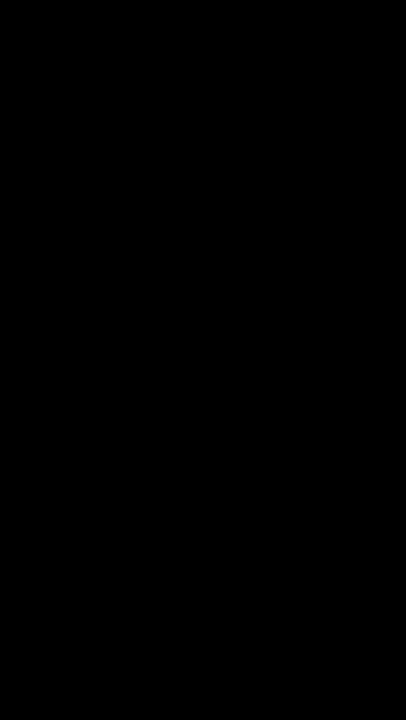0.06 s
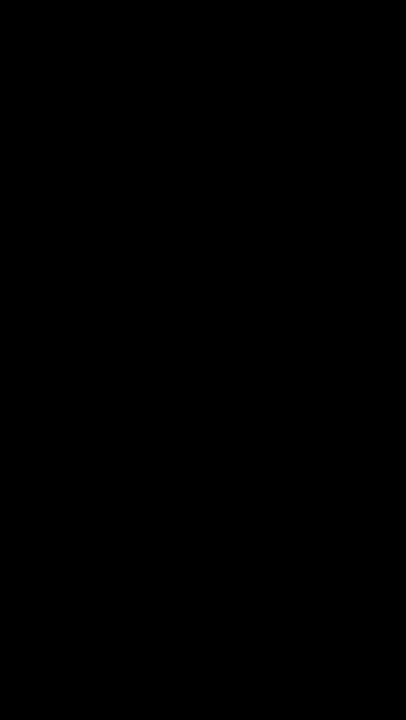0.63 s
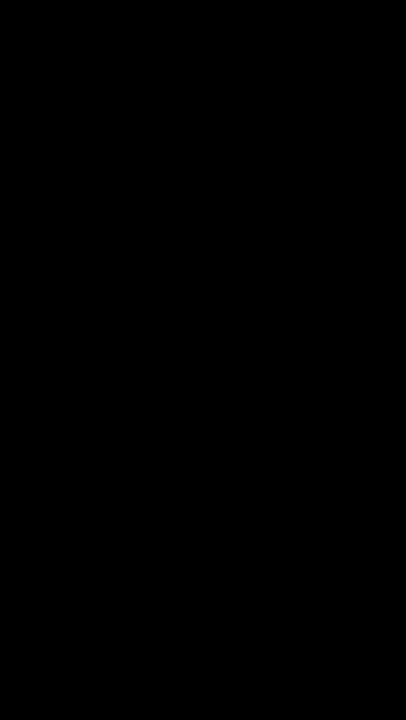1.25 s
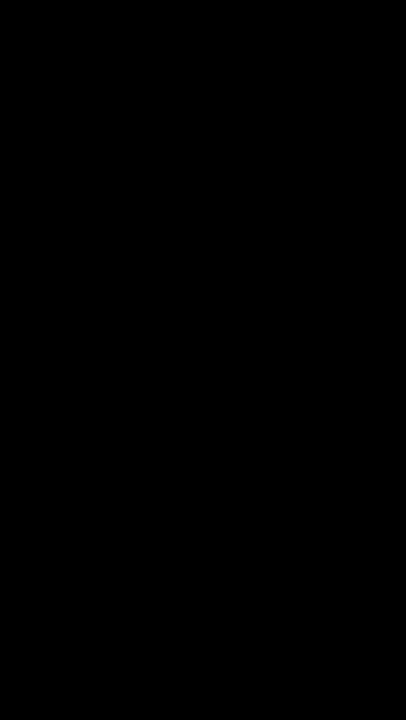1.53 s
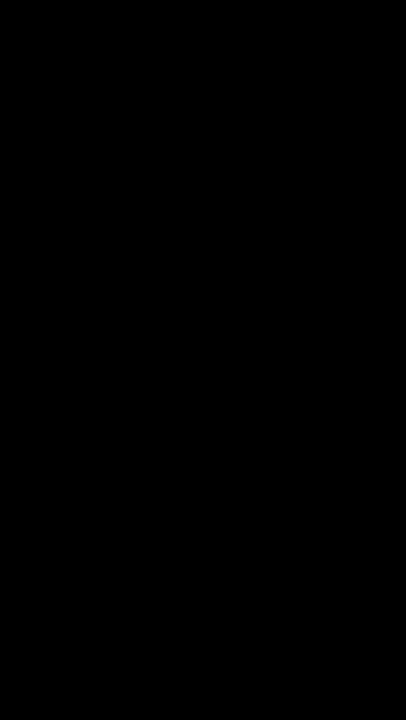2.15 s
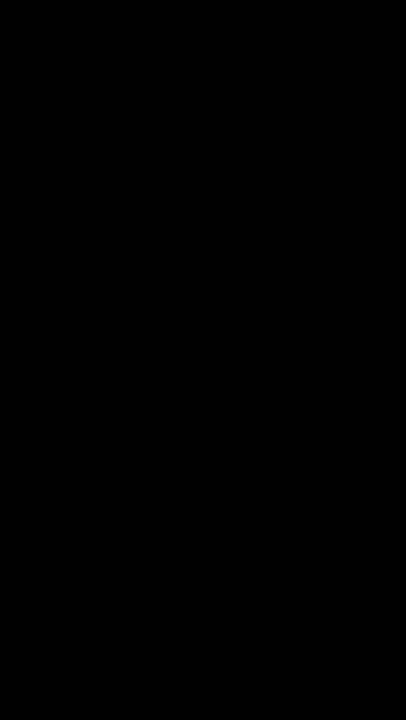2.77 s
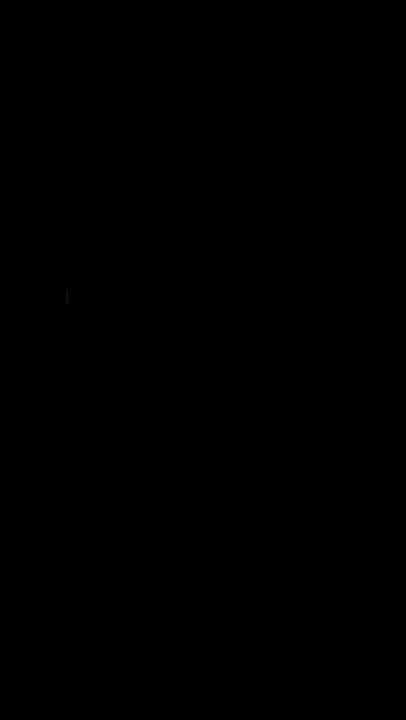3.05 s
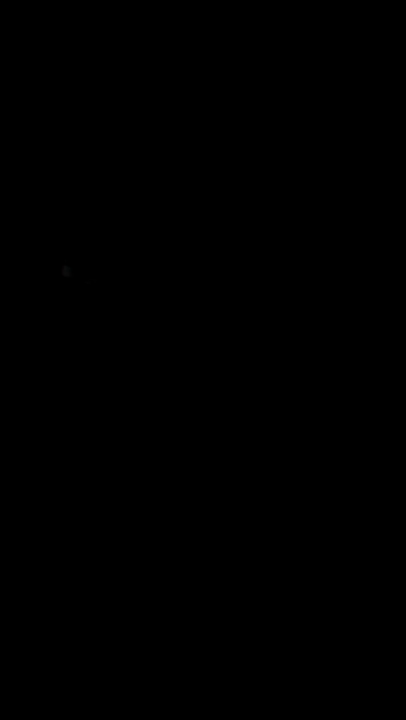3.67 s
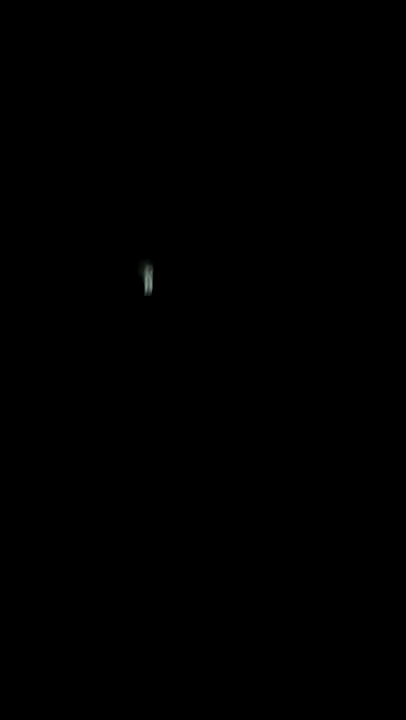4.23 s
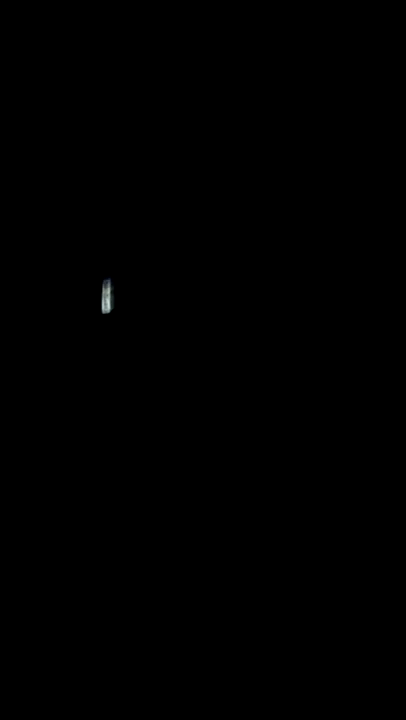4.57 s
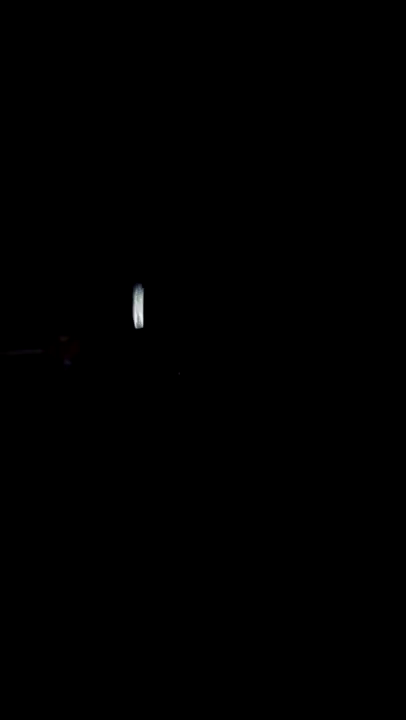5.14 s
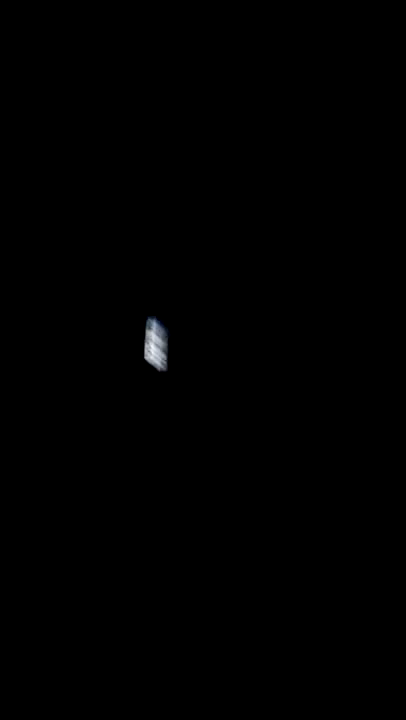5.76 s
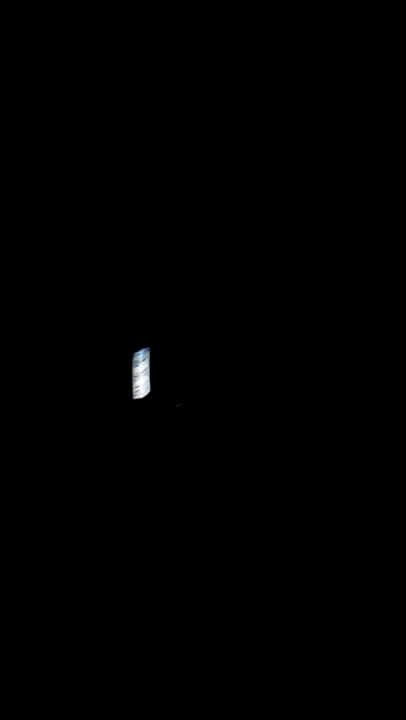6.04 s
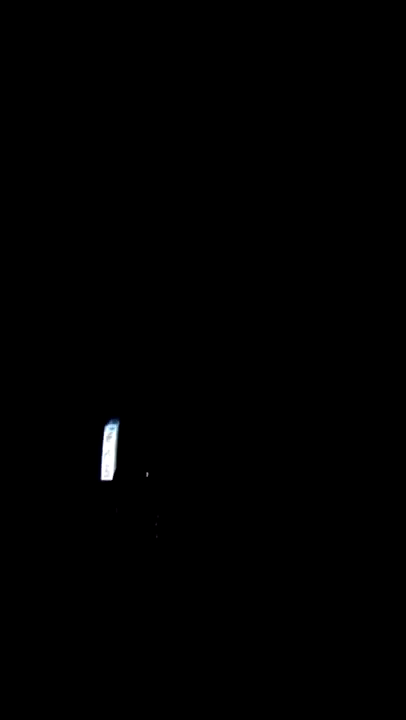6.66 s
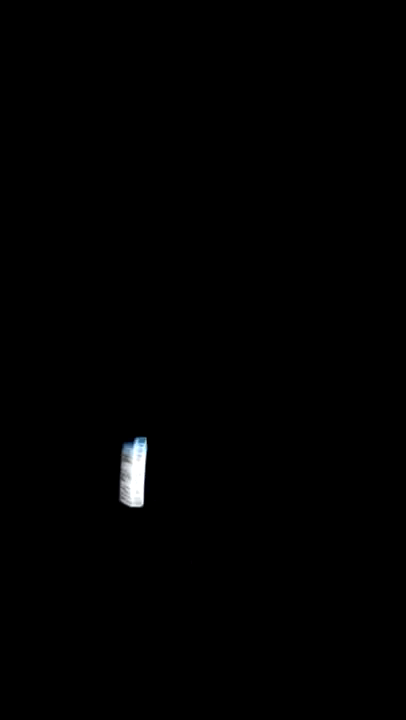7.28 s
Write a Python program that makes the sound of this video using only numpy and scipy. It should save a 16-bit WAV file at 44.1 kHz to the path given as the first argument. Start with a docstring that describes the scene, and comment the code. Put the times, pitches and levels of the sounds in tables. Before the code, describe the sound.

Wind bumps and rumbles unevenly against the microphone of a phone carried on a night walk. Underneath, slow, soft footsteps knock on a gritty path, with faint sole scuffs and trouser swishes. The muffled thumps are thickest around the middle, where a short clatter sounds on the phone case. A few small ticks come through, and quiet hiss and far traffic lie behind.

```python
"""Muffled wind thumps and rumble: eddies hit the microphone port of a phone carried on a night walk.
Underneath, slow heel strikes knock and crush grit, soles scuff and trouser legs swish.
A few small ticks; one short clatter rings the phone case near 4.1 s.
Behind: quiet night hiss, far traffic and faint far whines."""
import sys
import numpy as np
from scipy import signal
from scipy.fft import rfft, irfft, next_fast_len
from scipy.io import wavfile
from scipy.ndimage import uniform_filter1d

SR = 44100
rng = np.random.default_rng(int(sys.argv[2]) if len(sys.argv) > 2 else 0)


def pcm_store(signal):
    """Save signal as 16-bit PCM."""
    levels = np.round(np.clip(np.atleast_2d(signal), -1, 1) * 32767)
    wavfile.write(sys.argv[1], SR, levels.astype(np.int16).T)


N = 331191
T = np.arange(N) / SR

# strong eddies at the port (time [s], peak [dB], nominal half width [ms])
BUFFETS = [(.233, -37.5, 2.56), (0.4227, -28, 1.1), (.439, -25, 0.78), (1.885, -29.5, 2.03),
           (1.934, -26, 1.45), (2.039, -31, 1.33), (2.1102, -35, .93), (2.976, -27, 0.94),
           (3.121, -33, 0.91), (3.1807, -32.5, 1.13), (3.2072, -19, 0.88), (3.2256, -26, 0.74),
           (3.251, -24, 3.3), (3.383, -27.5, 1.73), (3.457, -34, 0.99), (3.468, -26.5, 0.9),
           (3.4847, -21.5, 0.76), (3.51, -29, 0.72), (3.551, -20.5, .5), (3.5603, -21.5, 0.53),
           (3.6185, -25.5, 0.95), (3.94, -30, 1.07), (3.9976, -30.5, 0.92), (4.0199, -27.5, 0.98),
           (4.0264, -20, 0.93), (4.1053, -29.5, 1.11), (4.261, -25.5, 1.52), (4.465, -30, 1.98),
           (4.554, -26, 1.13), (4.583, -34.5, 0.86), (4.603, -32.5, 1.02), (5.635, -35, 1.36),
           (6.022, -31.5, 2.34), (6.1248, -26.5, 1.05), (6.144, -26, 0.89), (6.152, -25, 0.81),
           (6.180, -32.5, 0.78), (6.486, -31, 1.77), (6.543, -29.5, 2.4), (6.666, -29.5, 1.48),
           (6.697, -35.5, 0.68), (6.7512, -26, 0.97), (6.7652, -26.5, 1.18)]
# air flow over the moving port (time [s], rumble level before lift [dB])
FLOW = [(0.0, -56.5), (0.4, -51), (0.62, -65.5), (1.04, -64), (1.21, -79), (1.5, -68.5), (1.67, -56.5),
        (2.07, -42), (2.26, -56.5), (2.8, -49), (3.09, -40.5), (3.45, -39.5), (4.01, -44), (4.26, -48),
        (4.45, -46), (4.63, -41), (5.05, -51), (5.2, -61.5), (5.45, -60.5), (5.8, -53.5), (6.02, -50.5),
        (6.23, -42.5), (6.62, -45.5), (6.83, -62), (7.23, -63.5), (7.5, -40.5)]
# puffs on top of the flow (centre [s], length [s], level [dB], small-eddy share [dB])
PUFFS = [(0.231, 0.23, -46.5, -20), (.425, 0.098, -31.5, -7), (0.512, 0.15, -42.5, -17),
         (.78, 0.033, -48.5, -28), (0.883, 0.068, -45, -33), (1.05, .07, -40.5, -20),
         (1.174, .05, -47, -23), (1.625, 0.15, -47.5, -30), (1.938, .11, -40, -10),
         (2.166, 0.21, -39, -11.5), (2.579, .12, -42.5, -15.5), (2.993, 0.052, -36.5, -13),
         (3.206, 0.072, -30, -7.5), (3.29, 0.12, -36, -8), (3.543, 0.13, -28.5, -6.5),
         (3.696, 0.12, -37.5, -9.5), (3.829, .08, -42, -7.5), (3.923, 0.072, -36, -13.5),
         (4.022, 0.073, -32.5, -4), (4.094, .07, -39, -8.5), (4.595, 0.29, -39, -6.5),
         (4.863, .12, -45, -22), (5.075, 0.17, -43, -16), (5.261, 0.042, -40, -19),
         (5.413, 0.041, -49.5, -28), (5.693, 0.2, -41.5, -11.5), (6.144, 0.071, -31.5, -5.5),
         (6.219, .09, -38, -4), (6.287, .08, -41, -9.5), (6.73, 0.14, -38.5, -7), (7.034, 0.037, -53, -30),
         (7.335, 0.17, -43.5, -18)]
# fine swirl (frequency [Hz], gain [dB])
SWIRL_SPECTRUM = [(120, -21.5), (260, 4.5), (380, 2.5), (520, -10), (640, -18), (780, -33), (1100, -58),
                  (3000, -90)]
# heel strikes (time [s], knock [dB], grit [dB])
HEEL_STRIKES = [(.439, -46, -81), (.939, -61, -73.5), (1.4599, -52.5, -75), (1.978, -53, -76),
                (2.489, -61, -70), (3.017, -69, -73.5), (3.528, -58, -75.5), (4.056, -50.5, -75.5),
                (4.583, -52, -75), (5.107, -80, -76), (5.644, -62, -72.5), (6.157, -47.5, -78),
                (6.695, -55.5, -78), (7.205, -64.5, -77.5)]
# heel on the path (frequency [Hz], gain [dB])
KNOCK_SPECTRUM = [(60, -10.5), (150, -6.5), (450, 6), (700, -10), (1200, -26.5), (2000, -29.5), (5000, -59)]
# gritty friction (frequency [Hz], gain [dB])
GRIT_SPECTRUM = [(300, -23), (800, -8.5), (1100, -6), (1600, 2), (2000, -1), (2400, -3), (3050, -4.5),
                 (3600, -2), (4500, -20), (5800, -24), (8000, -39.5), (16000, -41)]
# sole scuffs (centre [s], length [s], level [dB], tilt [dB/octave])
SCUFFS = [(1.031, 0.093, -73, -1.5), (1.162, 0.14, -81.5, 1), (1.551, 0.062, -80, 0),
          (1.665, 0.14, -82.5, 0.5), (2, 0.063, -64, -1), (2.034, 0.028, -70, 4.5),
          (2.189, 0.19, -79, -2.5), (2.821, 0.079, -82, 1), (3.107, 0.057, -71.5, 3.5),
          (3.209, 0.021, -76, 3), (3.736, 0.027, -74.5, -3), (4.092, 0.085, -76.5, 1),
          (4.184, .048, -76.5, -2), (4.796, 0.022, -79.5, 10), (4.932, 0.035, -65.5, -8.5),
          (5.135, 0.11, -69, -13), (5.209, .11, -69, 2.5), (5.331, .069, -75.5, 0), (5.667, .055, -77, -8),
          (5.737, 0.077, -74.5, -2.5), (5.85, .025, -79.5, -4), (6.199, .12, -81, 7),
          (6.355, 0.031, -76, 5), (7.306, 0.12, -76.5, -8), (7.416, 0.047, -79.5, 1)]
# trouser swishes (centre [s], length [s], level [dB])
SWISHES = [(0.176, 0.16, -78), (0.458, 0.064, -72), (1.309, .12, -81), (1.411, .11, -75),
           (1.55, 0.078, -74.5), (3.103, .088, -70.5), (3.613, .073, -77.5), (6.081, .14, -81.5)]
# cloth on cloth (frequency [Hz], gain [dB])
CLOTH_SPECTRUM = [(500, -39), (1300, -23), (1650, -3.5), (1950, -17.5), (2350, 5), (2650, -14),
                  (3000, -13.5), (3600, -17), (4500, -27), (12000, -49.5)]
# small hard ticks (time [s], level [dB], centre frequency [Hz])
TICKS = [(.685, -48, 3240), (0.691, -58, 3130), (.732, -63.5, 3900), (3.526, -60, 2230),
         (6.528, -52.5, 2360), (6.538, -62.5, 2600)]
# hits on the case (time [s], peak [dB], mode gain above 5 kHz [dB], scrape [dB])
CASE_HITS = [(4.1086, -47, -2, -84), (4.1137, -43.5, -1, -54.5), (4.1418, -34.5, 2.5, -62),
             (4.1490, -43, -23, -51.5), (4.1565, -51, 6, -61)]
# case resonances (frequency [Hz], T60 [s], gain [dB])
CASE_MODES = [(2470, 0.011, -4.5), (3430, 0.0048, 5.5), (3600, 0.0089, -1), (7030, 0.0036, 5),
              (7500, .002, 1), (9700, 0.0021, 2.5), (14800, .003, 3)]
# scrape along the case (frequency [Hz], gain [dB])
SCRAPE_SPECTRUM = [(600, -12), (2000, -3.5), (4100, 2.5), (5000, -6), (7000, -5), (11000, -10.5),
                   (13300, -16), (15000, -1), (16500, -16)]
# night hiss (frequency [Hz], density before trim [dB/Hz])
HISS_SPECTRUM = [(30, -112), (100, -104), (250, -108), (500, -110), (800, -113), (1200, -117), (2000, -120),
                 (3700, -122), (4600, -125), (6300, -124), (8500, -131), (13500, -132), (15000, -126),
                 (16000, -127)]
# far traffic (time [s], level [dB])
TRAFFIC_LEVEL = [(0, -75.5), (.3, -74.5), (.8, -85), (1.6, -81.5), (2.7, -84.5), (4, -89), (5.3, -84.5),
                 (7.5, -95.5)]
# far traffic (frequency [Hz], gain [dB])
TRAFFIC_SPECTRUM = [(100, -15), (280, -1), (430, -2), (620, -4.5), (850, -11.5), (1500, -20), (5000, -46)]
# far whines (centre [s], length [s], frequency [Hz], level [dB])
WHINES = [(0.143, 0.11, 429, -66.5), (2.701, 0.2, 524, -74), (5.182, .16, 900, -77), (5.35, .21, 904, -79),
          (6.218, 0.098, 1260, -79), (6.634, 0.2, 893, -74.5), (6.94, .38, 890, -72)]

EDDY_WINDOW_S = 0.08


def buffets():
    """Each strong eddy hits the port as one thump."""
    out = np.zeros(N)
    for start_s, peak_db, half_ms in BUFFETS:
        thump = port(eddy(half_ms))
        add(out, start_s - EDDY_WINDOW_S / 2, thump * undb(peak_db) / np.abs(thump).max())
    return out


def eddy(half_ms, core_size=1.702, roundness=1.533, largest_eddy_hz=58):
    """Pressure dip of a passing vortex, centred in its window; narrower is brighter."""
    n = int(EDDY_WINDOW_S * SR)
    hz = np.fft.rfftfreq(n, 1 / SR)
    core = np.exp(-(2 * np.pi * hz * half_ms / 1000 / core_size) ** roundness)
    shoulders = hz ** 2 / (hz ** 2 + largest_eddy_hz ** 2)  # slight rise on both sides
    dip = np.roll(irfft(core * shoulders, n), n // 2)
    return -dip / dip.max()


def port(pressure, cutoff_hz=79.8):
    """Microphone bass cut: turns a dip into a down-up swing."""
    return signal.sosfilt(signal.butter(2, cutoff_hz, "high", fs=SR, output="sos"), pressure)


def airflow(lift_db=1.16, flutter_db=0.5, flutter_s=0.045, fast_air_db=-38, fast_share_db=-8.5):
    """Fluttering flow plus puffs. Returns (rumble level [dB], small-eddy share [dB])."""
    flutter = np.interp(T, np.arange(200) * flutter_s, rng.standard_normal(200))
    flow_db = curve(FLOW) + lift_db + flutter_db * flutter
    share_db = fast_share_db - 0.82 * np.maximum(fast_air_db - flow_db, 0)  # falls as air slows
    energy = undb(flow_db) ** 2
    small_energy = energy * undb(share_db) ** 2
    for centre_s, length_s, level_db, puff_share_db in PUFFS:
        puff = swell(np.full(int(length_s * SR), undb(level_db))) ** 2
        add(energy, centre_s - length_s / 2, puff)
        add(small_energy, centre_s - length_s / 2, puff * undb(puff_share_db) ** 2)
    return 10 * np.log10(energy), 10 * np.log10(small_energy / energy)


def turbulence(count=1300, jitter_s=0.004, width_spread=0.26, size_spread_db=4.5):
    """Random eddies; faster air makes them louder and narrower and breaks them into swirl."""
    flow_db, share_db = airflow()
    half_ms = np.clip(0.62 - 0.15 * share_db, 1.3, 3.8)
    draws = rng.standard_normal((count, 4))
    pressure = np.zeros(N)
    for time_s, (late, wide, size, side) in zip(np.linspace(0, T[-1], count), draws):
        dip = eddy(half_ms[int(time_s * (SR - 1))] * np.exp(width_spread * wide))
        pulse = np.sign(side) * dip * undb(size_spread_db * size)  # push or suction
        add(pressure, time_s + jitter_s * late - EDDY_WINDOW_S / 2, pulse)
    rumble = port(pressure)
    rumble /= running_rms(rumble)
    swirl = unit(colour(rng.standard_normal(N) * np.abs(rumble), SWIRL_SPECTRUM))
    swirl_db = -2.5 + 1.86 * np.minimum(share_db, -4)
    return (rumble + swirl * undb(swirl_db)) * undb(flow_db)


def footsteps(attack_s=0.0014, knock_s=0.01, grit_s=0.024, ground_s=0.078, ground_db=-16):
    """Each heel knocks on the path and crushes a little grit."""
    out, t = np.zeros(N), T[:SR // 5]
    attack = np.minimum(t / attack_s, 1)
    knock_decay = np.exp(-t / knock_s) + undb(ground_db) * np.exp(-t / ground_s)
    grit_decay = np.exp(-t / grit_s)
    for start_s, knock_db, grit_db in HEEL_STRIKES:
        knock = grains(0.2, KNOCK_SPECTRUM, patchy_db=3.5) * knock_decay
        grit = grains(0.2, GRIT_SPECTRUM, spread_db=2.5, tilt_db_oct=-1, patchy_db=6.5) * grit_decay
        add(out, start_s, (undb(knock_db) * knock + undb(grit_db) * grit) * attack)
    return out


def scuffs():
    """Soles slide over grit."""
    out = np.zeros(N)
    for centre_s, length_s, level_db, tilt_db_oct in SCUFFS:
        slide = grains(length_s, GRIT_SPECTRUM, spread_db=3.5, tilt_db_oct=tilt_db_oct, patchy_db=4.5)
        add(out, centre_s - length_s / 2, undb(level_db) * swell(slide))
    return out


def swishes():
    """Trouser legs rub past each other."""
    out = np.zeros(N)
    for centre_s, length_s, level_db in SWISHES:
        rub = grains(length_s, CLOTH_SPECTRUM, patchy_db=7)
        add(out, centre_s - length_s / 2, undb(level_db) * swell(rub))
    return out


def faint_scuffs(count=24, length_s=0.044, level_db=-82, range_db=2.5):
    """Soles scuff lightly over grit; strokes vary in length, level and brightness."""
    out, gap_s = np.zeros(N), T[-1] / count
    for k, (late, long, size, tilt) in enumerate(rng.uniform(-1, 1, (count, 4))):
        stroke_s = length_s * 2 ** long
        stroke = grains(stroke_s, GRIT_SPECTRUM, spread_db=4, tilt_db_oct=4 * tilt, patchy_db=4.5)
        add(out, (k + late / 2) * gap_s, undb(level_db + range_db * size) * swell(stroke))
    return out


def case_clatter(detune_spread=0.02, scrape_decay_s=0.0105):
    """Each hit rings the case modes and scrapes along the case."""
    out = np.zeros(N)
    for start_s, peak_db, upper_db, scrape_db in CASE_HITS:
        detunes = 1 + detune_spread * rng.standard_normal(len(CASE_MODES))
        click = sum(undb(gain_db + upper_db * (hz > 5000)) * ring(hz * detune, t60_s)
                    for (hz, t60_s, gain_db), detune in zip(CASE_MODES, detunes))
        add(out, start_s, undb(peak_db) * click / np.abs(click).max())
        scrape = grains(1 / 12, SCRAPE_SPECTRUM, spread_db=3.5)
        decay = np.exp(-T[:len(scrape)] / scrape_decay_s)
        add(out, start_s, undb(scrape_db) * scrape * decay)
    return out


def ticks(t60_s=0.014):
    """Small hard contacts, two close modes each."""
    out = np.zeros(N)
    for start_s, level_db, hz in TICKS:
        add(out, start_s, undb(level_db) * (ring(hz * 0.95, t60_s) + ring(hz * 1.06, t60_s)) / 2)
    return out


def night_hiss(trim_db=-1):
    """Steady noise floor."""
    return colour(rng.standard_normal(N), HISS_SPECTRUM) * np.sqrt(SR / 2) * undb(trim_db)


def traffic():
    """Far, dull roar with a drifting level."""
    return unit(colour(rng.standard_normal(N), TRAFFIC_SPECTRUM)) * undb(curve(TRAFFIC_LEVEL))


def whines(resonance_width_hz=81):
    """Far, unsteady tones: noise passed twice through one resonance."""
    out = np.zeros(N)
    for centre_s, length_s, hz, level_db in WHINES:
        b, a = signal.iirpeak(hz, hz / resonance_width_hz, fs=SR)
        band = signal.lfilter(b, a, signal.lfilter(b, a, rng.standard_normal(SR)))
        tone = unit(band[-int(length_s * SR):])
        add(out, centre_s - length_s / 2, undb(level_db) * swell(tone))
    return out


def grains(length_s, spectrum, spread_db=0, tilt_db_oct=0, patchy_db=0):
    """Friction noise: dense tiny slips with chance resonances; rms 1, at most 0.28 s."""
    n, slip_samples = 12288, 32
    noise = rng.standard_normal(n)
    slip_db = spread_db * np.repeat(rng.exponential(size=n // slip_samples), slip_samples)
    resonances = np.column_stack([np.geomspace(300, 16000, 60), patchy_db * rng.standard_normal(60)])
    slips = colour(noise * undb(slip_db), resonances)
    return unit(colour(slips, spectrum, tilt_db_oct)[:int(length_s * SR)])


def ring(hz, t60_s, attack_s=0.0003):
    """One damped mode."""
    t = T[:SR // 20]
    return np.sin(2 * np.pi * hz * t) * np.exp(-np.log(1000) * t / t60_s) * (1 - np.exp(-t / attack_s))


def colour(x, spectrum, tilt_db_oct=0):
    """Filter by (frequency [Hz], gain [dB]) points plus a tilt."""
    size = next_fast_len(len(x))
    octave = np.log2(np.maximum(np.fft.rfftfreq(size, 1 / SR), 1))
    hz, db = np.transpose(spectrum)
    gain_db = np.interp(octave, np.log2(hz), db + tilt_db_oct * np.log2(hz / hz[0]))
    return irfft(rfft(x, size) * undb(gain_db), size)[:len(x)]


def swell(x):
    """Half-sine fade in and out."""
    return x * np.sin(np.linspace(0, np.pi, len(x)))


def curve(rows):
    """Interpolate (time [s], value) rows per sample."""
    return np.interp(T, *np.transpose(rows))


def running_rms(x):
    """Rms over about 40 ms."""
    power = uniform_filter1d(uniform_filter1d(x ** 2, size=1500), size=1500)
    return np.sqrt(np.abs(power) + 1e-14)


def unit(x):
    """Scale to rms 1."""
    return x / np.sqrt(np.mean(x ** 2) + 1e-30)


def undb(db):
    """Decibels to gain."""
    return 10 ** (np.asarray(db) / 20)


def add(out, start_s, x):
    """Mix x into out from start_s, cropped to fit."""
    i = int(round(start_s * SR))
    x, i = x[max(-i, 0):], max(i, 0)
    out[i:i + len(x)] += x[:max(len(out) - i, 0)]


def scene():
    """Mono sum at the microphone."""
    wind = buffets() + turbulence()
    walker = footsteps() + scuffs() + swishes() + faint_scuffs()
    clicks = case_clatter() + ticks()
    background = night_hiss() + traffic() + whines()
    return (wind + walker + clicks + background)[None]


def record(dry, low_hz=30, top_hz=16000):
    """The phone cuts the deepest bass and the top."""
    bass_cut = signal.sosfiltfilt(signal.butter(2, low_hz, "high", fs=SR, output="sos"), dry)
    return signal.sosfilt(signal.ellip(10, 0.2, 70, top_hz, fs=SR, output="sos"), bass_cut)


dry = scene()
out = record(dry)
pcm_store(out)
```